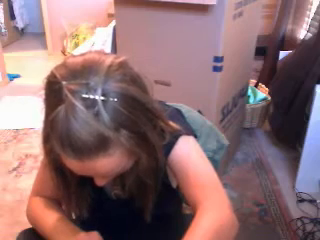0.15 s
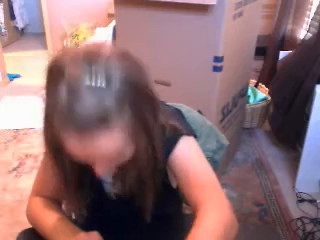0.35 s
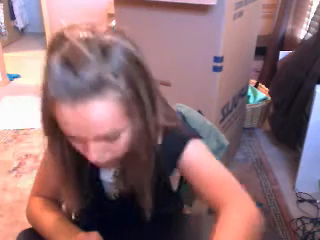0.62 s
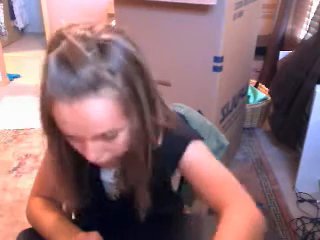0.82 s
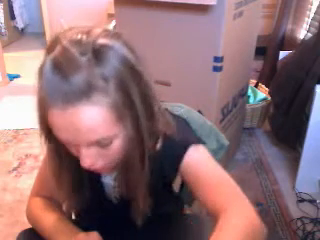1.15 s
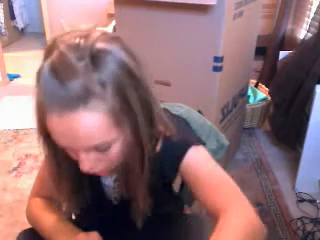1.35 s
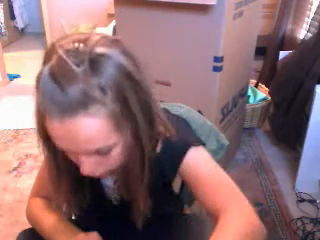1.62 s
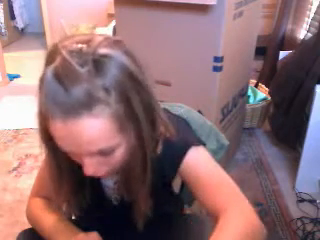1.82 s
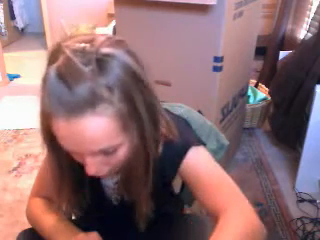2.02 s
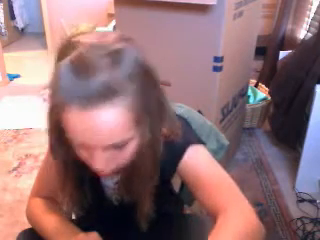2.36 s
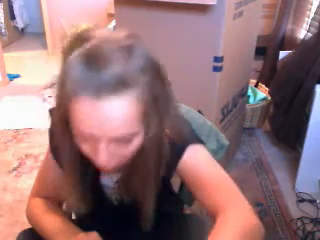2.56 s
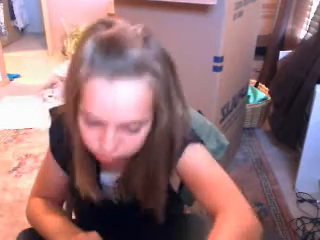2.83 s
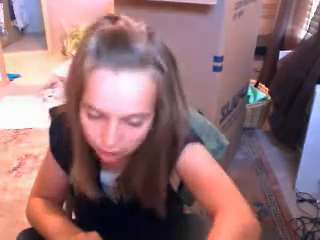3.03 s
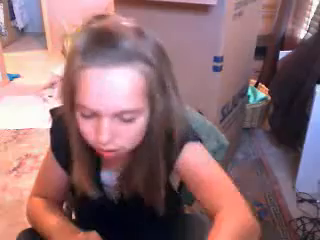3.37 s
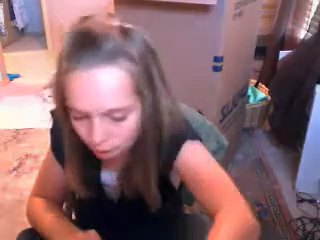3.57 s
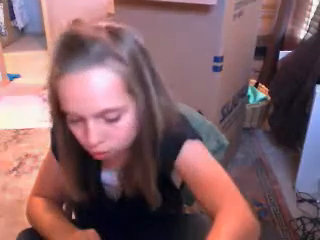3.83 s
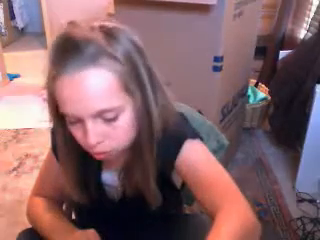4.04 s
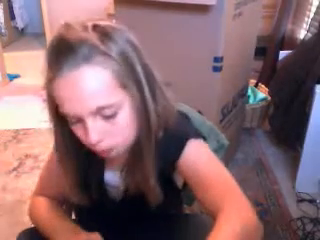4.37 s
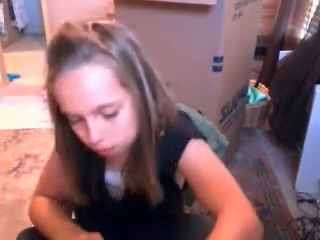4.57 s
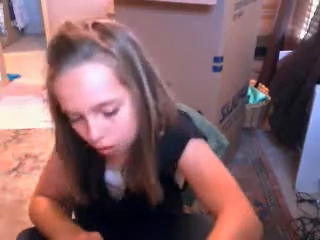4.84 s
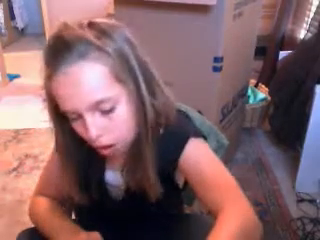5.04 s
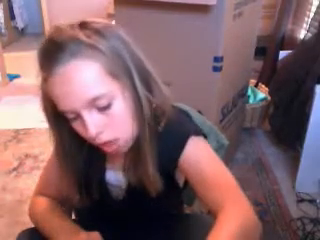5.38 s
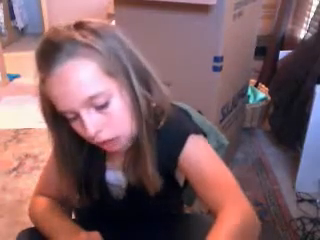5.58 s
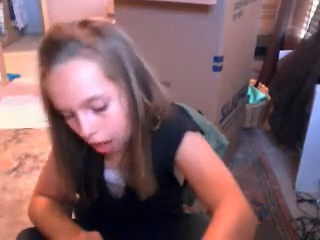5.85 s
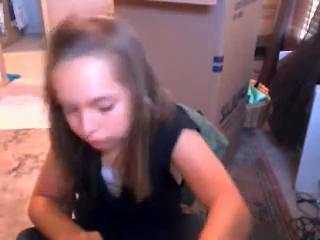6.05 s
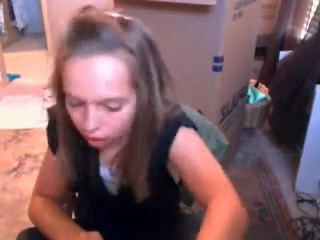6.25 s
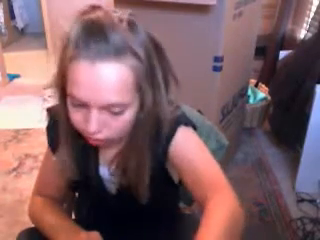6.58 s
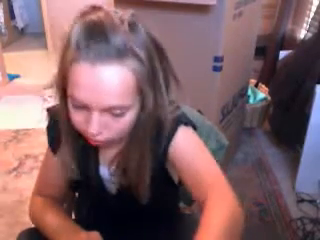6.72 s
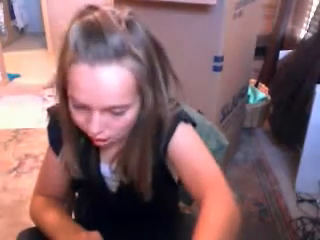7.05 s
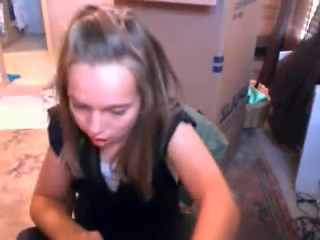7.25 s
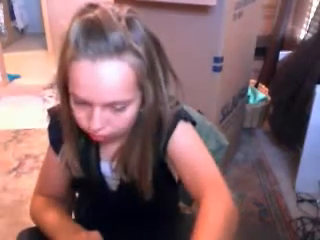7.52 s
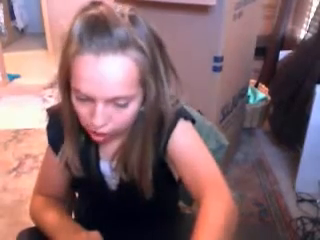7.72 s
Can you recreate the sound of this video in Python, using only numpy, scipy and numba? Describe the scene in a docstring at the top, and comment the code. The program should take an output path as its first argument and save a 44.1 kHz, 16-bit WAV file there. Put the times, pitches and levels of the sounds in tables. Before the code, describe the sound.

A felt-tip marker makes two longer strokes on paper, then scribbles rapidly back and forth with dry squeaky scrapes in a quiet room.

```python
"""A felt-tip marker on paper, close to a small microphone in a quiet room: two long strokes, then quick
back-and-forth scribbling. Slips of fibre over the paper grain, made as uneven noise, excite resonances of
nib, barrel and sheet. The hand shuffles the sheet, the nib catches with crackles of noise, the barrel creaks
and taps, and the desk thuds and bumps softly. A faint high tone pulses over the shaped noise of the room."""
import sys
import numpy as np
from scipy import signal
from scipy.fft import rfft, irfft
from scipy.io import wavfile
from scipy.ndimage import uniform_filter1d
from numba import njit

SR = 44100
rng = np.random.default_rng(int(sys.argv[2]) if len(sys.argv) > 2 else 0)


def pcm_store(signal):
    """Save signal as 16-bit PCM."""
    levels = np.round(np.clip(np.atleast_2d(signal), -1, 1) * 32767)
    wavfile.write(sys.argv[1], SR, levels.astype(np.int16).T)


N = 348390  # samples

# strokes of the nib: (start [s], length [s], nib peak level [dB], share of the length spent rising [0-1],
# barrel against nib [dB], sheet rasp against nib [dB],
# head start of the barrel [s]: long on the pull, short on the push)
STROKES = [(0.078, 0.088, -93.5, 0.65, 23, -6, 0.001), (0.295, 0.081, -63.0, 0.47, -9, 0, 0.018),
           (0.398, 0.23, -47, 0.53, -11.5, -3, 0.001), (0.506, 0.26, -44.5, 0.34, -8.5, 0, 0.01),
           (0.925, 0.24, -52, 0.5, -10.5, -2.5, 0.001), (1.056, 0.2, -53, 0.53, -5, -1.5, 0.018),
           (1.322, 0.093, -80, 0.44, -10, -5, 0.001), (1.499, 0.041, -77.0, 0.46, -12, -10, 0.001),
           (1.584, 0.096, -42, 0.32, -16, -9.5, 0.0038), (1.673, 0.12, -41.5, 0.45, -15.5, -8, 0.001),
           (1.81, 0.11, -42, 0.19, -11.5, -6.5, 0.001), (1.929, 0.089, -42, 0.25, -12, -9, 0.00091),
           (2.034, 0.099, -44.5, 0.41, -8.5, -5, 0.0059), (2.123, 0.037, -58.0, 0.19, -19, -20, 0.012),
           (2.15, 0.14, -44, 0.11, -9.5, -8, 0.001), (2.259, 0.11, -44, 0.44, -10, -7.5, 0.001),
           (2.357, 0.13, -44.5, 0.25, -11, -6, 0.001), (2.499, 0.098, -44, 0.51, -7, -7.5, 0.0076),
           (2.614, 0.085, -39.5, 0.37, -14, -13, 0.001), (2.721, 0.1, -45.5, 0.42, -9.5, -3.5, 0.005),
           (2.844, 0.081, -42, 0.21, -12, -5.5, 0.001), (2.957, 0.096, -46.5, 0.48, -7.0, -4, 0.0045),
           (3.076, 0.09, -43.5, 0.29, -12.5, -8, 0.001), (3.183, 0.12, -41, 0.36, -9.5, -5.5, 0.0026),
           (3.31, 0.1, -41.5, 0.15, -13, -8.0, 0.001), (3.384, 0.059, -54, 0.4, -2, -6, 0.003),
           (3.426, 0.104, -46, 0.4, -9.5, -6.5, 0.002), (3.538, 0.1, -43, 0.31, -12, -8.5, 0.001),
           (3.657, 0.093, -45, 0.49, -9.5, -3, 0.001), (3.776, 0.087, -46.5, 0.31, -6, -4, 0.001),
           (3.852, 0.062, -65.5, 0.55, -21, -3, 0.016), (3.89, 0.14, -43.5, 0.23, -12.5, -3.5, 0.001),
           (4.009, 0.1, -41.5, 0.23, -14, -7, 0.001), (4.14, 0.11, -42.5, 0.26, -13, -2, 0.0038),
           (4.251, 0.083, -44.5, 0.24, -9, -6.5, 0.001), (4.367, 0.1, -44.0, 0.35, -10.5, -5, 0.011),
           (4.485, 0.1, -44.5, 0.31, -9.0, -5.0, 0.0024), (4.605, 0.093, -45, 0.41, -12.5, -4.5, 0.0076),
           (4.709, 0.1, -46.5, 0.3, -13, -7, 0.001), (4.826, 0.11, -47.0, 0.45, -14, -3, 0.01),
           (4.942, 0.095, -58, 0.34, 3, 4.5, 0.0038), (5.065, 0.091, -47, 0.48, -7, -2, 0.0064),
           (5.185, 0.093, -51.0, 0.33, -8, -2.5, 0.001), (5.308, 0.081, -51, 0.46, -4, 1, 0.001),
           (5.415, 0.11, -52.5, 0.13, -4.5, 2.5, 0.001), (5.537, 0.11, -55, 0.37, -2.5, -0.5, 0.001),
           (5.653, 0.1, -51.0, 0.23, -5.5, 0, 0.005), (5.727, 0.1, -61.5, 0.23, -25, -4, 0.005),
           (5.776, 0.098, -51.5, 0.43, -3.5, 0.5, 0.014), (5.83, 0.19, -48.5, 0.18, -8, -6.5, 0.001),
           (5.98, 0.07, -80, 0.5, -5, -2, 0.001), (6.024, 0.1, -53.5, 0.49, -3, -6, 0.014),
           (6.131, 0.062, -61.5, 0.55, 4.5, 5, 0.001), (6.17, 0.084, -43.5, 0.03, -4, -9, 0.001),
           (6.264, 0.11, -54, 0.5, -0.5, 0.5, 0.025), (6.383, 0.13, -55.5, 0.35, 0.5, -2, 0.001),
           (6.517, 0.11, -49, 0.47, -5.5, -10.5, 0.014), (6.632, 0.11, -51.5, 0.29, -6, -2, 0.001),
           (6.746, 0.097, -60, 0.58, 7, 3.5, 0.023), (6.873, 0.097, -41, 0.54, -10, -2.5, 0.0083),
           (6.957, 0.048, -68, 0.2, -11, -4, 0.001), (6.985, 0.099, -55.5, 0.68, -3.5, -11, 0.025),
           (7.089, 0.13, -50, 0.37, -7.5, -4, 0.001), (7.242, 0.11, -45.5, 0.45, -8, -6.5, 0.047),
           (7.343, 0.099, -49.5, 0.4, -11.0, -5, 0.015), (7.481, 0.091, -49, 0.44, -12.0, -5.5, 0.018),
           (7.583, 0.12, -50, 0.19, -7.5, -5.5, 0.001), (7.708, 0.11, -51.5, 0.44, -3.5, 0, 0.0098),
           (7.814, 0.088, -51, 0.5, -7.0, -0.5, 0.009)]
# resonances of nib, barrel and sheet rasp: (nominal centre [Hz], width [Hz], relative level [dB])
NIB = [(5204, 880, 0), (5880, 1160, 1.5), (6815, 265, -4), (7960, 1900, -23), (8350, 5300, -30)]
BARREL = [(1700, 730, -11.5), (2267, 220, -6), (2556, 516, 5.5)]
RASP = [(3357, 590, -7.5), (3840, 1060, -7.5), (4425, 1670, 5.5)]
# the grip shifts the rings: (time [s], pitch factor of the barrel [ratio], pitch factor of the nib [ratio])
GRIP = [(0, 0.98, 0.99), (1.3, 1.204, 1.03), (1.55, 0.96, 1.006), (3, 1.02, 0.98), (4.8, .99, 1.013),
        (5.6, 1.024, 0.97), (6.5, .99, 0.96), (7.9, 0.96, .99)]
# how steeply each ring follows the hand's speed: exponents (rising, falling)
NIB_POWER, BARREL_POWER, RASP_POWER = (2.42, 2.72), (2.45, 1.65), (1.68, 2.44)
BARREL_EARLY, RASP_EARLY = 0.8, 0.96  # these rings peak after this part of the nib's rise
RASP_LEAD_SHARE = 0.37  # the rasp takes this part of the barrel's head start
STROKE_HASTE = 1.092  # the hand reaches full speed this much sooner than the rise share, and holds it
NIB_GLIDE = .04  # share by which the nib rings higher at full speed than at rest


def marker():
    """Friction-excited resonance: one stream of slips rings the nib high, the barrel and rasp lower."""
    grain = slips(spread_db=2.5, flutter_db=1.5)
    barrel_db, rasp_db, lead_s = np.transpose(STROKES)[4:]
    grip_s, *grip_factors = np.transpose(GRIP)
    barrel_bend, nib_bend = (np.interp(np.arange(N) / SR, grip_s, f) for f in grip_factors)

    equal_strokes = [(s, length, 0., rise) for s, length, _, rise, *_ in STROKES]
    speed = np.minimum(swells(equal_strokes, power=1.4), 1)
    nib_bend = nib_bend * (1 + NIB_GLIDE * (uniform_filter1d(speed, size=200) - .5))

    nib_gain = swells(STROKES, NIB_POWER, haste=STROKE_HASTE)
    nib = nib_gain * ring(grain, NIB, drift=0.029, patchy_db=-1.5, bend=nib_bend)
    barrel_gain = swells(STROKES, BARREL_POWER, barrel_db, lead_s, BARREL_EARLY, STROKE_HASTE)
    barrel = barrel_gain * ring(grain, BARREL, drift=.04, patchy_db=1.0, bend=barrel_bend)
    rasp_gain = swells(STROKES, RASP_POWER, rasp_db, RASP_LEAD_SHARE * lead_s, RASP_EARLY, STROKE_HASTE)
    rasp = rasp_gain * ring(grain, RASP, drift=0.047, patchy_db=1.5)
    return nib + barrel + rasp


# the sheet shuffles under the hand: (start [s], length [s], peak level [dB], share spent rising [0-1],
# upper against lower modes [dB])
SHUFFLES = [(0.391, 0.3, -52, 0.81, -2), (1.084, 0.053, -69, 0.4, 10.0), (1.119, 0.14, -63.5, 0.24, 14),
            (1.814, 0.054, -72, 0.23, -4), (1.917, 0.16, -69, 0.18, 6), (2.032, 0.073, -60, 0.4, 6),
            (2.113, 0.089, -49, 0.7, 9), (2.2, 0.15, -61.5, 0.4, -10), (2.479, 0.1, -62.5, 0.18, -5.0),
            (2.602, 0.051, -63.5, 0.47, 4), (2.703, 0.075, -61, 0.59, -8), (2.84, 0.036, -72, 0.39, 4),
            (2.947, 0.13, -60, 0.03, -7), (3.164, 0.13, -59.5, 0.26, 2), (3.39, 0.066, -61, 0.46, -10),
            (3.654, 0.064, -55, 0.35, -21), (3.707, 0.055, -57.5, 0.45, -2), (3.835, 0.037, -58, 0.57, -9),
            (3.881, 0.064, -52, 0.4, -1.0), (3.937, 0.073, -63, 0.5, 2), (4, 0.042, -48.5, 0.63, 7.0),
            (4.127, 0.1, -53, 0.2, 1), (4.246, 0.053, -60.5, 0.3, 2), (4.32, 0.088, -57.5, 0.76, -6),
            (4.391, 0.13, -60, 1, 5), (4.55, 0.053, -62.5, 0.88, 0.0), (4.596, 0.054, -60, 0.36, -7),
            (4.634, 0.062, -66.5, 0.9, 10), (4.707, 0.023, -54.5, 0.47, 12), (4.823, 0.051, -52, 0.28, 1.5),
            (4.853, 0.14, -65, 0.82, 3.0), (4.998, 0.12, -51, 0.6, 5), (5.121, 0.093, -55, 0.78, 11),
            (5.238, 0.071, -53.5, 0.62, 6.0), (5.289, 0.071, -53, 0.33, -1), (5.35, 0.089, -60, 0.96, 7.0),
            (5.454, 0.15, -54.5, 0.63, 0.5), (5.687, 0.066, -60, 0.83, -6), (5.761, 0.073, -61, 0.3, -2),
            (5.819, 0.14, -66.5, 0.15, 3), (5.924, 0.128, -62.5, 0.38, 0), (6.015, 0.035, -60, 0.3, -1),
            (6.038, 0.069, -60.5, 0.97, 6.0), (6.129, 0.042, -62, 0.3, 3.0), (6.144, 0.21, -59, 0.64, -2),
            (6.243, 0.077, -47.5, 0.24, -12), (6.369, 0.071, -63, 0.07, -7), (6.438, 0.071, -61, 0.9, -5),
            (6.498, 0.055, -60, 0.64, -5), (6.619, 0.044, -55.5, 0.54, 6.0), (6.696, 0.1, -48, 0.46, -10),
            (6.83, 0.074, -46, 0.8, -8), (6.922, 0.049, -59, 0.8, 5.0), (6.967, 0.082, -58.5, 0.15, -5),
            (7.076, 0.073, -50.5, 0.58, 6.0), (7.181, 0.12, -49.5, 0.34, 7), (7.298, 0.083, -52, 0.63, 4),
            (7.46, 0.062, -61, 0.16, -6.5), (7.569, 0.12, -60.5, 0.1, 5), (7.653, 0.089, -51.5, 0.43, -5),
            (7.803, 0.055, -59, 0.5, -3)]
# resonances of the loose sheet, two lower then two upper: (nominal centre [Hz], width [Hz], level [dB])
SHEET = [(748, 218, -11), (947, 175, 3.5), (1183, 330, 3.5), (1340, 296, -4.5)]
SHEET_DRAG_DB, SHEET_LEAD_S = -32, 0.013  # every stroke drags the sheet: level against the nib, head start


def sheet():
    """Modal excitation by coarser rubbing: where the hand lies decides which modes speak."""
    rub = slips(spread_db=1.5, flutter_db=3.5)
    tilt_db = np.transpose(SHUFFLES)[4]
    drag = swells(STROKES, power=1.26, lift_db=SHEET_DRAG_DB, lead_s=SHEET_LEAD_S)
    upper_db = -10 * np.log10(1 + undb(-2 * tilt_db))  # share of the energy
    lower_db = upper_db - tilt_db
    out = 0
    for modes, share_db in (SHEET[:2], lower_db), (SHEET[2:], upper_db):
        shuffle = swells(SHUFFLES, power=(1.8, 1.9), lift_db=share_db)
        out = out + np.hypot(shuffle, drag) * ring(rub, modes, drift=0.032, patchy_db=3.5)
    return out


# the nib catches and the sheet snaps: (time [s], peak level before the felt's blunting [dB], centre [Hz],
# time for the noise to decay by 60 dB [s])
SNAPS = [(.637, -24, 4200, .008), (1.136, -27, 5500, .005), (2.371, -31, 5400, .008),
         (3.321, -32, 5500, .01), (3.392, -33, 5000, .004), (3.402, -29, 5000, .004),
         (3.802, -33, 5500, .005), (5.846, -34, 5800, .005), (6.088, -38, 5000, .005),
         (6.18, -24, 3600, .012), (6.184, -26, 2200, .012), (6.19, -28, 2000, .01),
         (6.586, -36, 4000, .004), (6.9145, -25, 4500, .008), (6.928, -25, 5000, .006),
         (7.6, -29, 4500, .005)]


def snaps():
    """Impulsive excitation: each catch is a quickly decaying crackle of noise in a wide band."""
    out = np.zeros(N)
    t = np.arange(1500) / SR
    for s, db, hz, t60 in SNAPS:
        attack = np.minimum(t / 0.00039, 1)
        crackle = rng.standard_normal(len(t)) * attack * np.exp(-np.log(1000) * t / t60)
        centre = np.full(len(t), 1. * hz)
        for _ in range(3):
            crackle = svf(crackle, centre, 0.64 * hz)
        out = burst(out, s, db, crackle)
    # the soft felt blunts the top of every catch
    return signal.sosfilt(signal.butter(8, 7000, fs=SR, output="sos"), out)


# the marker body creaks in the grip: (start [s], length [s], peak level [dB], share spent rising [0-1])
CREAKS = [(0.39, 0.268, -73, 0.95), (0.577, 0.13, -62.0, 0.72), (1.023, 0.1, -57.5, 0.08),
          (1.802, 0.15, -63, 0.25), (2.121, 0.022, -64, 0.33), (2.125, 0.12, -54, 0.44),
          (2.209, 0.049, -61, 0.74), (2.363, 0.09, -56, 0.23), (2.847, 0.039, -53.5, 0.51),
          (2.869, 0.052, -53, 0.47), (3.638, 0.14, -65, 0.58), (3.894, 0.099, -56.5, 0.17),
          (4.134, 0.086, -62.5, 0.5), (4.821, 0.13, -63.5, 0.2), (5.053, 0.065, -58.5, 0.3),
          (5.837, 0.089, -48, 0.13), (5.944, 0.072, -56, 0.17), (6.168, 0.042, -52, 0.5),
          (6.254, 0.062, -63, 0.28), (6.698, 0.043, -54, 0.67), (6.729, 0.069, -58, 0.46),
          (6.844, 0.076, -60, 0.5), (6.898, 0.046, -57, 0.46), (7.096, 0.053, -62, 0.4),
          (7.179, 0.088, -55.5, 0.3), (7.571, 0.094, -66, 0.26)]
# resonances of the marker body: (nominal centre [Hz], width [Hz], relative level [dB])
BODY = [(1650, 320, -7), (1939, 310, -0.5)]


def creaks():
    """Friction-excited resonance: fluttering slips of their own ring the marker body."""
    grain = slips(spread_db=3.5, flutter_db=4.0)
    return swells(CREAKS, power=(1.8, 2.2)) * ring(grain, BODY, drift=0.043, patchy_db=-2.0)


# the marker body taps the sheet: (time [s], peak level [dB], pitch [Hz])
TAPS = [(0.638, -39, 2220), (1.038, -41, 2040), (1.5938, -56, 2270), (1.8188, -53, 2210), (2.13, -46, 1720),
        (2.149, -42, 1710), (2.171, -31.5, 1750), (2.38, -54, 2300), (2.38, -44, 1610), (2.6233, -51, 1620),
        (2.8539, -49, 2250), (2.865, -37.5, 1680), (3.783, -61, 2290), (3.903, -54, 1880),
        (4.8337, -50, 1890), (5.8454, -41, 1820), (5.9532, -36, 1960), (5.985, -42.5, 2020),
        (6.1802, -32, 2040), (6.7121, -57, 1470), (7.112, -46, 1770), (7.5963, -49, 1900)]


def taps():
    """Free damped oscillation: each tap rings the plastic body for a few cycles."""
    out = np.zeros(N)
    t = np.arange(2000) / SR
    envelope = np.minimum(t / 0.00087, 1) * np.exp(-t / 0.0023)
    for s, db, hz in TAPS:
        out = burst(out, s, db, np.sin(2 * np.pi * hz * t) * envelope)
    return out


# soft thuds of the desk: (start [s], length [s], nominal peak level before the waver [dB],
# share spent rising [0-1], pitch [Hz])
THUDS = [(0.206, 0.09, -54.5, 0.8, 259.0), (0.402, 0.06, -67.5, 0.57, 285.0),
         (0.495, 0.095, -64.5, 0.33, 249.0), (1.072, 0.164, -72, 0.7, 272.0),
         (1.235, 0.16, -67.5, 0.29, 251.0), (1.428, 0.092, -66, 0.4, 283.0),
         (1.482, 0.14, -57.5, 0.54, 303.0), (1.588, 0.07, -62.5, 0.62, 258.0),
         (1.705, 0.24, -74.5, 0.14, 256.0), (1.962, 0.16, -68, 0.67, 306.0),
         (2.838, 0.059, -66, 0.5, 247.0), (3.469, 0.1, -61.5, 0.45, 267.0),
         (3.682, 0.089, -68, 0.64, 273.0), (4.077, 0.2, -75, 0.98, 262.0), (4.293, 0.11, -69, 0.27, 274.0),
         (4.54, 0.073, -69.0, 0.4, 246.0), (4.628, 0.135, -69.5, 0.5, 303.0),
         (4.689, 0.123, -70, 0.7, 260.0), (4.997, 0.095, -73, 0.72, 259.0),
         (5.118, 0.076, -64.5, 0.4, 260.0), (5.385, 0.089, -66, 0.73, 289.0),
         (5.602, 0.081, -69.0, 0.87, 270.0), (5.667, 0.22, -71.5, 0.7, 273.0),
         (5.85, 0.095, -72, 0.64, 261.0), (7.014, 0.11, -61.5, 0.84, 277.0),
         (7.656, 0.11, -61.5, 0.65, 259.0), (7.798, 0.12, -64.0, 0.3, 270.0)]
# resonances of the desk: (nominal centre [Hz], width [Hz], relative level [dB])
DESK = [(119.6, 20, 2), (248.6, 33, -4.5), (318, 47, -6.5), (443, 275, -10.5)]
THUD_RUMBLE_DB = -1  # rumble in a thud against its nominal peak


def thuds():
    """Modal response: the desk top swells and dies at its own pitch, with a burst of low rumble."""
    t = np.arange(N) / SR
    tone = sum(np.sqrt(2) * swells([row], power=3.5) * np.sin(2 * np.pi * row[4] * t) for row in THUDS)
    tone = tone * undb(-2.5 + 4.2 * walk(60))  # the ring wavers
    shake = ring(rng.standard_normal(N), DESK[1:3], drift=.03, patchy_db=4.5)
    return tone + swells(THUDS, power=2.5, lift_db=THUD_RUMBLE_DB) * shake


# hollow bumps of the hand on the desk: (start [s], length [s], peak level [dB], share spent rising [0-1])
BUMPS = [(0.516, 0.47, -78, 0.3), (1.515, 0.103, -78, 0.6), (2.124, 0.11, -69.5, 0.6),
         (3.685, 0.14, -70.5, 0.37), (3.859, 0.2, -75.5, 0.35), (4.056, 0.2, -67.5, 0.53),
         (4.286, 0.113, -74.0, 0.7), (4.422, 0.25, -72.5, 0.23), (4.66, 0.08, -74, 0.52),
         (4.88, 0.096, -73, 0.6), (5.346, 0.141, -74.5, 0.73), (5.819, 0.15, -64.5, 0.1),
         (5.894, 0.055, -72.0, 0.57), (6.165, 0.061, -68, 0.5), (6.448, 0.093, -74, 0.26),
         (6.69, 0.085, -77, 0.51), (6.819, 0.133, -69, 0.4), (7.059, 0.13, -66, 0.77),
         (7.539, 0.091, -65, 0.25), (7.633, 0.2, -69, 0.46)]


def bumps():
    """Broad resonance: noise through the highest desk mode swells with each bump of the hand."""
    hollow = ring(rng.standard_normal(N), DESK[3:], drift=0.074, patchy_db=4.0)
    return swells(BUMPS, power=1.9) * hollow


def rumble():
    """Random excitation of modes: steady noise rings the whole desk, swaying a little in level."""
    desk = ring(rng.standard_normal(N), DESK, drift=0.028, patchy_db=6.0)
    sway_db = 1 * walk(16)
    return undb(-80.5 + sway_db) * desk


# the whine: (time [s], peak level between strokes [dB])
WHINE = [(0, -78), (.5, -78), (.75, -85), (1.5, -83), (2, -87), (7.9, -89)]
WHINE_HZ, WHINE_PERIOD_S, WHINE_START_S = 7601, .1342, .036


def whine():
    """Amplitude modulation: a thin tone, on for half of every period, swells while the nib scrapes."""
    t = np.arange(N) / SR
    gate = 1. * ((t - WHINE_START_S) % WHINE_PERIOD_S < WHINE_PERIOD_S / 2)
    on = uniform_filter1d(gate, size=300)
    swell = (1 + swells(STROKES, NIB_POWER) / undb(-75)) ** .35
    level = undb(np.interp(t, *np.transpose(WHINE)))
    return on * level * swell * np.sin(2 * np.pi * WHINE_HZ * t)


# spectrum of the hush: (frequency [Hz], relative level per Hz [dB])
HUSH = [(15, -62), (25, -23.5), (114, -9), (199, -9.5), (253, -6), (373, -15), (410, -14), (441, -21),
        (535, -16), (618, -17.5), (866, -16), (1470, -25), (6900, -28.5), (7410, -26.5), (7970, -33.5),
        (10400, -40), (17500, -120)]
HUSH_DB = -72.5  # nominal RMS level


def hush():
    """Stationary noise with a shaped spectrum: room and microphone noise, gently uneven."""
    hz = np.fft.rfftfreq(N, 1 / SR) + 1  # 1 Hz up, so the logarithm exists at zero
    table_hz, table_db = np.transpose(HUSH)
    shape = undb(np.interp(np.log(hz), np.log(table_hz), table_db))
    noise = irfft(rfft(rng.standard_normal(N)) * shape, N)
    return undb(HUSH_DB + 1.8 * walk(8)) * unit(noise)


def slips(spread_db, flutter_db):
    """Stick-slip as noise: dense slips of random sign, a few much larger, in a fluttering stream."""
    size_db = spread_db * rng.exponential(size=N)
    return rng.standard_normal(N) * undb(size_db + flutter_db * walk(150))


def ring(x, modes, drift, patchy_db, bend=0.99):
    """Modal superposition: steep resonances, each wandering in pitch and strength; overall RMS is 1."""
    out = 0
    for hz, width, db in modes:
        centre = hz * bend * (1 + drift * walk(12))
        push = x * rng.choice([-1., 1.], N)  # each mode gets slips of the same sizes with its own random signs
        mode = svf(svf(push, centre, 1. * width), centre, 1. * width)
        out = out + undb(db + patchy_db * walk(30)) * mode
    return unit(out)


def swells(rows, power, lift_db=0., lead_s=0., early=1., haste=0.99):
    """Power law of speed: quarter-sine rise and fall, loudness as speed to a power, overlaps as energy."""
    energy = np.zeros(N)
    lifts, leads = np.broadcast_to(lift_db, len(rows)), np.broadcast_to(lead_s, len(rows))
    rise_power, fall_power = np.broadcast_to(power, 2)
    for (s, length, db, rise, *_), lift, lead in zip(rows, lifts, leads):
        i = np.arange(max(int((s - lead) * SR), 0), min(int((s + length) * SR), N))
        u = (i / SR - s + lead) / (length + lead)  # progress, 0-1
        rise = np.clip(rise * early, .03, .97)
        ramp = np.minimum(u / rise, (1 - u) / (1 - rise))
        speed = np.sin(np.pi / 2 * np.clip(haste * ramp, 0, 1))
        loudness = speed ** np.where(u < rise, rise_power, fall_power)
        energy[i] += (undb(db + lift) * loudness) ** 2
    return np.sqrt(energy)


def burst(out, s, db, wave):
    """Linear superposition: return out with a wave of the given peak laid in at time s."""
    i = max(int(s * SR), 0)
    wave = wave[:N - i]
    wave = undb(db) * wave / np.abs(wave).max()
    return out + np.r_[np.zeros(i), wave, np.zeros(N - i - len(wave))]


def walk(rate):
    """Slow random modulation: levels held 1 / rate s and slewed twice; spread near 1."""
    k = int(SR / rate)
    held = np.repeat(rng.standard_normal(N // k + 1), k)
    return 1.21 * uniform_filter1d(uniform_filter1d(held, k), k)[:N]


@njit
def svf(x, hz, width):
    """Second-order resonance: a state-variable band-pass, gain 1 at a centre that may move."""
    y, band, low = np.empty(len(x)), 0., 0.
    for i in range(len(x)):
        g, k = np.tan(np.pi * hz[i] / SR), width / hz[i]
        v = (band + g * (x[i] - low)) / (1 + g * (g + k))
        band, low, y[i] = 2 * v - band, low + 2 * g * v, k * v
    return y


def undb(db):
    """Decibel law: level to amplitude factor."""
    return 10 ** (np.asarray(db) / 20)


def unit(x):
    """Energy normalisation: scale to an RMS of 1."""
    return x / np.sqrt(np.mean(x ** 2))


def room(near):
    """Diffuse reverberation: add a faint tail of noise that decays by 60 dB in 43 ms."""
    t = np.arange(8000) / SR
    tail = rng.standard_normal(8000) * np.exp(-np.log(1000) * t / 0.043)
    tail = tail / np.sqrt(np.sum(tail ** 2))
    return near + undb(-19.5) * signal.fftconvolve(near, tail)[:N]


def treble_cut(near):
    """Band limitation: steep cut at 8.2 kHz, with a weaker band kept up to 9.4 kHz."""
    air = signal.sosfilt(signal.ellip(6, 1, 30, [8250., 9400.], "bandpass", fs=SR, output="sos"), near)
    below = signal.sosfilt(signal.ellip(8, 1, 40, 8200., fs=SR, output="sos"), near)
    return below + undb(-10.5) * air


def scene():
    """Superposition: close sources, with room tail and a steep treble cut, over the whine and hush."""
    near = marker() + sheet() + snaps() + creaks() + taps() + thuds() + bumps() + rumble()
    return (treble_cut(room(near)) + whine() + hush())[None, :]


def record(dry):
    """Band limitation: the recorder cuts the top above 10.65 kHz and adds a trace of hiss."""
    cut = signal.sosfilt(signal.ellip(8, .2, 70, 10650, fs=SR, output="sos"), dry)
    return cut + undb(-103) * rng.standard_normal(dry.shape)


dry = scene()
out = record(dry)
pcm_store(out)
```